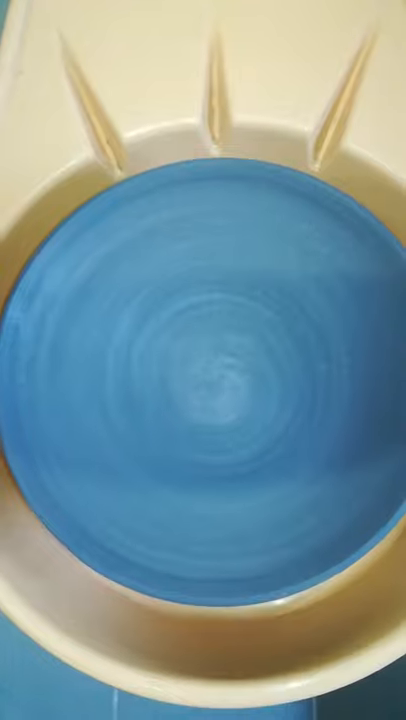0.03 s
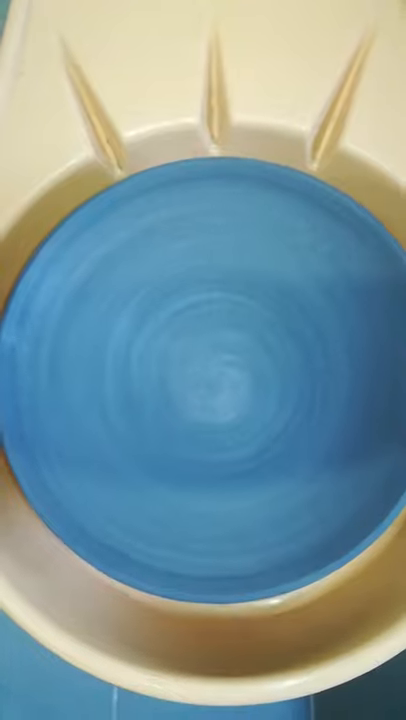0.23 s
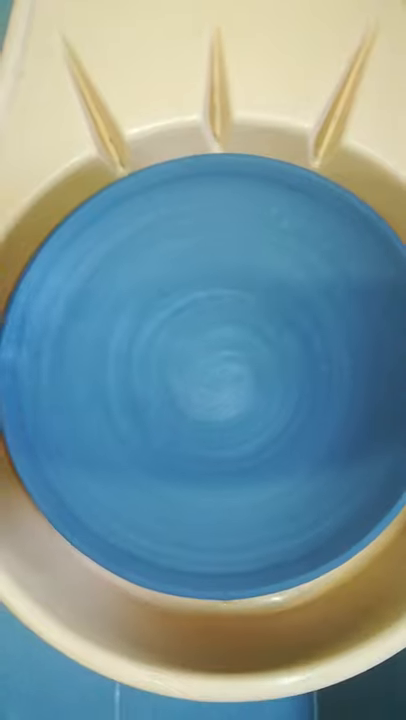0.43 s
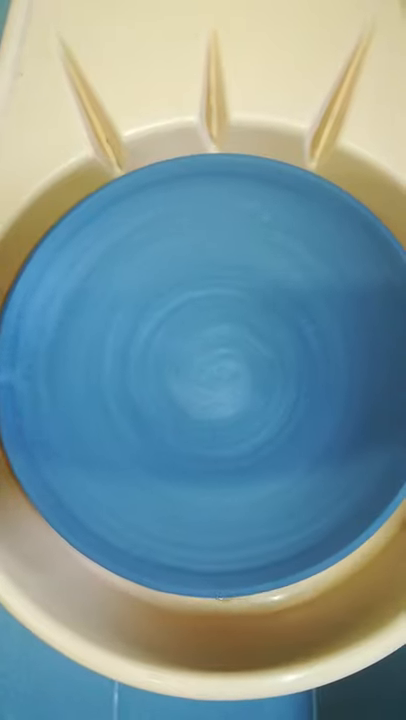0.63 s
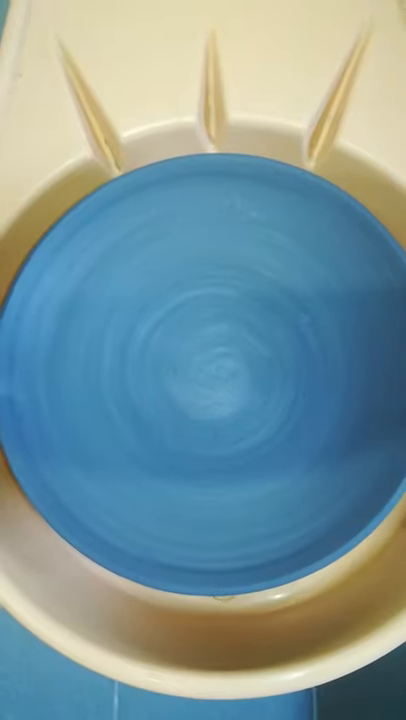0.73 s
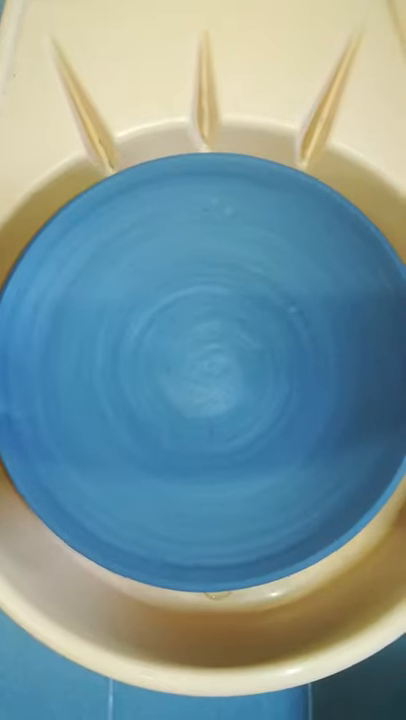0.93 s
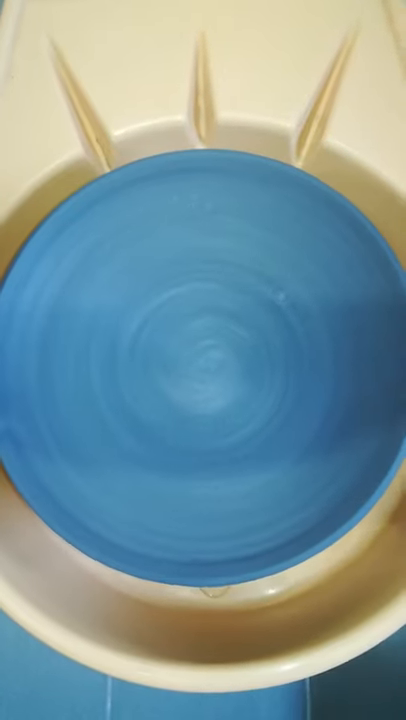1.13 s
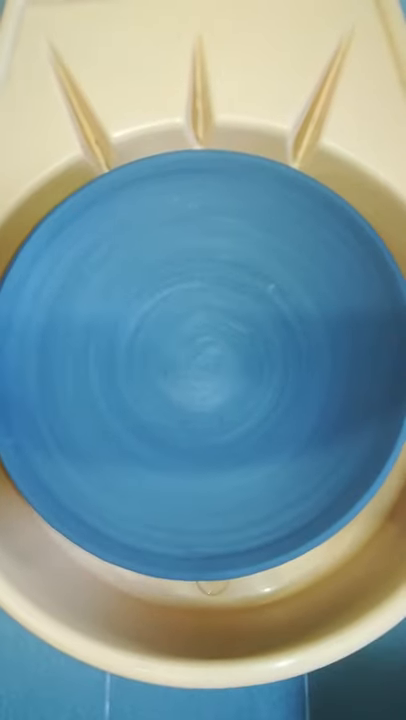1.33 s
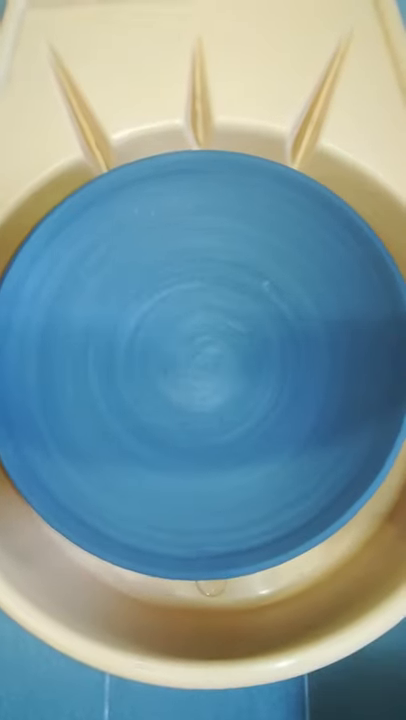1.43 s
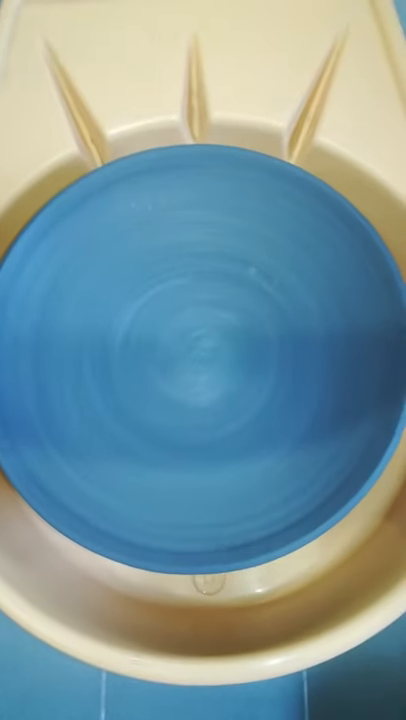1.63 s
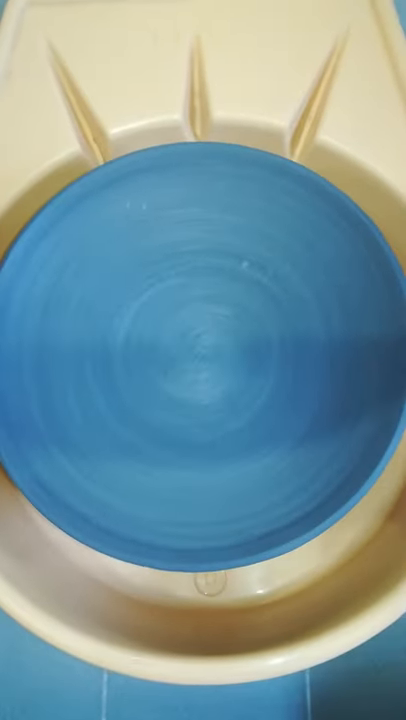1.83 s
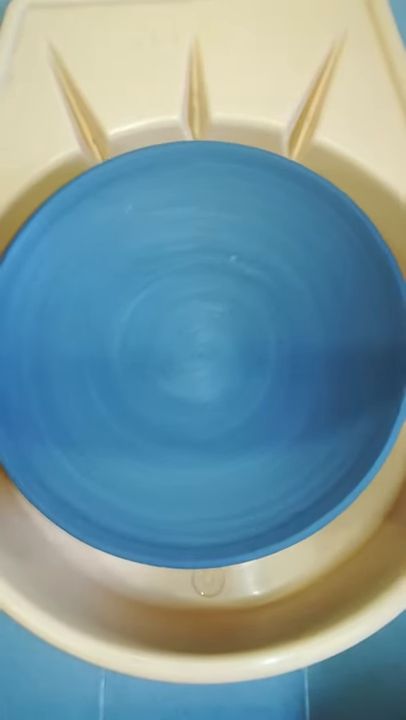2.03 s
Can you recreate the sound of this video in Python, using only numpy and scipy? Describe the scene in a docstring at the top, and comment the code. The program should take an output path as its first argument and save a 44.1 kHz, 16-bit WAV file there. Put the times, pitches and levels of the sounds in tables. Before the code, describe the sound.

An electric pottery wheel hums faintly in a quiet room after a small microphone thump.

```python
"""An electric pottery wheel turns steadily in a quiet room, close to a two-port microphone.
The wheel is a low noise rumble and its motor a faint wavering hum, set in wide room air and hiss.
The scene opens from silence: voltage steps make a small double thump as the microphone switches on.
Everything is a little louder just after that, the bass gently swells and sinks, and one tiny tick passes.
"""
import sys
import numpy as np
from scipy import signal
from scipy.fft import rfft, irfft
from scipy.io import wavfile
from scipy.ndimage import uniform_filter1d

SR = 44100
rng = np.random.default_rng(int(sys.argv[2]) if len(sys.argv) > 2 else 0)


def digitize_waveform(pressure):
    """Quantize a signal to 16-bit integers and store it at the path in sys.argv[1].

    Rows of a 2-D input are taken as channels; values are limited to [-1, 1].
    """
    field = np.atleast_2d(pressure).T
    bounded = np.clip(field, -1, 1)
    quanta = np.round(bounded * 32767).astype(np.int16)
    wavfile.write(sys.argv[1], SR, quanta)


N = 92610
T = np.arange(N) / SR


# Colour of the wheel's rumble and the air around it: frequency_hz, relative_db
RUMBLE_COLOUR = [(20, 3), (50, 2.5), (95, 2), (120, -1.5), (150, 0), (210, -3.5), (280, -4), (370, -11.5),
                 (560, -18), (1050, -14.5), (1250, -13.5), (2200, -19), (4000, -19.5), (8200, -23.5),
                 (11000, -27.5), (15700, -30)]
def wheel_rumble(level_db=-69):
    """The turning wheel: bass-heavy noise with an airy top, reaching both ports alike."""
    return gain(level_db) * coloured_noise(RUMBLE_COLOUR)


# Steady motor and frame tones: pitch_hz, level_db, waver_depth
HUM_TONES = [(85, -79.5, .6), (100, -77, .45), (151, -85, .7), (199, -86.5, .7), (230, -76, .2),
             (1202, -93.5, .7)]
# Upper motor tones: pitch_hz, level_db, waver_depth
UPPER_TONES = [(289, -84, .4), (321.5, -89, .4)]
# Fader ride on the upper tones: time_s, gain_db
UPPER_RIDE = [(.32, -8), (.42, 6), (.5, -5.5), (.7, 4.5), (.87, -6.5), (1.07, 3), (1.25, -4), (1.7, -1.5),
              (1.88, 4.5), (2.1, -5.5)]
def motor_hum():
    """Motor and frame hum evenly while two upper tones swell and fade."""
    return wavering_tones(HUM_TONES) + fader(UPPER_RIDE) * wavering_tones(UPPER_TONES)


# Fader ride on the low end: time_s, gain_db
BASS_RIDE = [(.27, 4), (.36, -2.5), (.48, -0.5), (.57, 3), (.7, 1), (1.0, -1.5), (1.4, -0.5), (1.62, -1),
             (1.74, -1), (1.85, -3.5), (2.1, 0.5)]
def bass_swell(sound, crossover_hz=140):
    """The low end rises and falls a little under a steady top."""
    bass = signal.sosfiltfilt(signal.butter(4, crossover_hz, fs=SR, output="sos"), sound)
    return sound + (fader(BASS_RIDE) - 1) * bass


# Switch-on voltage steps: start_s, level_db, rise_s, right_lag_s, rebound_depth
THUMP_STEPS = [(.2029, -37, .00005, 0, .4), (.2242, -43.5, .00005, .0007, 0), (.2245, -43, .003, 0, 0)]
def microphone_thump():
    """The microphone powers up with a double thump; the last two steps merge into one hit."""
    thump = np.zeros((2, N))
    for start_s, level_db, rise_s, right_lag_s, rebound_depth in THUMP_STEPS:
        thump[0] += gain(level_db) * voltage_step(start_s, rise_s, rebound_depth)
        thump[1] += gain(level_db) * voltage_step(start_s + right_lag_s, rise_s, rebound_depth)
    return thump


def voltage_step(start_s, rise_s, rebound_depth):
    """The voltage jumps, may kick back once, then drains to zero: a clicky attack on a soft body."""
    rebound_s, rebound_width_s, drain_s = .00048, .00028, .125
    age_s = np.maximum(T - start_s, 0)
    attack = 1 - np.exp(-(age_s / rise_s) ** 2)
    kickback = 1 - rebound_depth * np.exp(-((age_s - rebound_s) / rebound_width_s) ** 2)
    drain = np.exp(-(age_s / drain_s) ** 1.6)
    return -attack * kickback * drain


def tick(peak_s=1.3475, level_db=-75, width_s=.0012, band_hz=(4200, 8000)):
    """One tiny, bright blip of noise."""
    band = signal.butter(2, band_hz, "band", fs=SR, output="sos")
    noise = unit_rms(signal.sosfilt(band, rng.standard_normal(N)))
    return gain(level_db) * noise * np.exp(-((T - peak_s) / width_s) ** 2)


# Colour of the air and hiss that differ between the ports: frequency_hz, relative_db
AIR_COLOUR = [(20, -28), (55, -17), (90, -5.5), (280, 0), (560, -1.5), (950, -5.5), (1500, -9.5),
              (2500, -9), (4500, -11), (8200, -14.5), (11000, -19.5), (15700, -19.5)]
def room_air(level_db=-73):
    """A bed of air and hiss, in opposite polarity left and right for width."""
    side = gain(level_db) * coloured_noise(AIR_COLOUR)
    return np.array([side, -side])


def wavering_tones(tones, waver_hz=4):
    """Sine tones, each wandering in strength and phase."""
    hum = np.zeros(N)
    for pitch_hz, level_db, waver_depth in tones:
        waver = unit_rms(1 + waver_depth * (drift(waver_hz) + 1j * drift(waver_hz)))
        carrier = np.exp(2j * np.pi * (pitch_hz * T + rng.random()))
        hum += gain(level_db) * np.sqrt(2) * (waver * carrier).real
    return hum


def coloured_noise(colour, patch_db=1.0, patch_s=.08, patch_hz=500):
    """Noise of rms 1, shaped by an EQ curve, with faint patches drifting through it."""
    frame, hop = 1024, 256
    spectrogram = signal.stft(rng.standard_normal(N), nperseg=frame, noverlap=frame - hop)[2]
    patches = uniform_filter1d(rng.standard_normal(spectrogram.shape), int(patch_s * SR / hop), axis=1)
    patches = unit_rms(uniform_filter1d(patches, int(patch_hz * frame / SR), axis=0))
    noise = signal.istft(spectrogram * gain(patch_db * patches), nperseg=frame, noverlap=frame - hop)[1]
    frequency_hz, relative_db = np.transpose(colour)
    eq_db = np.interp(np.log(np.fft.rfftfreq(N, 1 / SR) + 1), np.log(frequency_hz + 1), relative_db)
    return unit_rms(irfft(rfft(noise[:N]) * gain(eq_db), N))


def drift(rate_hz):
    """Slow random motion of rms 1."""
    hz = np.fft.rfftfreq(N, 1 / SR)
    return unit_rms(irfft(rfft(rng.standard_normal(N)) / (1 + (hz / rate_hz) ** 4), N))


def fader(ride):
    """A fader ride as a gain for every sample."""
    return gain(np.interp(T, *np.transpose(ride)))


def gain(db):
    """Decibels to gain."""
    return 10 ** (db / 20)


def unit_rms(sound):
    """Scales to rms 1."""
    return sound / np.sqrt(np.mean(np.abs(sound) ** 2) + 1e-20)


# Fader ride on all that the microphone picks up as it comes on: time_s, gain_db
PICKUP_RIDE = [(.203, -3), (.235, 1), (.3, 2), (.44, 3), (.47, 0.4), (.9, 0), (2.1, 0)]
def scene():
    """Silence, the switch-on thump, then the running wheel in its room."""
    running = bass_swell(motor_hum() + wheel_rumble() + room_air() + tick())
    microphone_on = T > THUMP_STEPS[0][0]
    return microphone_on * fader(PICKUP_RIDE) * running + microphone_thump()


def record(dry, cutoff_hz=15750):
    """A steep high cut takes off the very top of the hiss."""
    taps = signal.firwin(511, cutoff_hz, window=("kaiser", 9), fs=SR)
    return signal.oaconvolve(dry, taps[None], "same", axes=1)


dry = scene()
out = record(dry)
digitize_waveform(out)
```